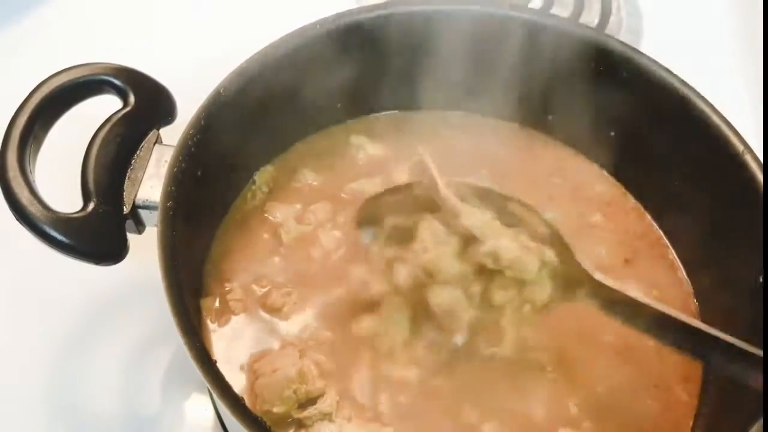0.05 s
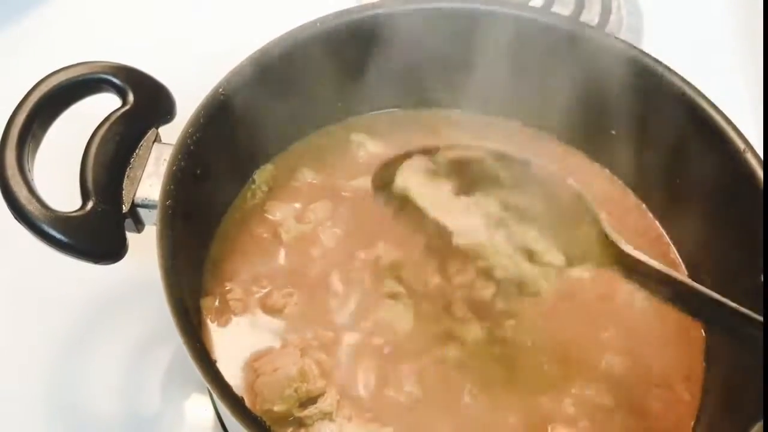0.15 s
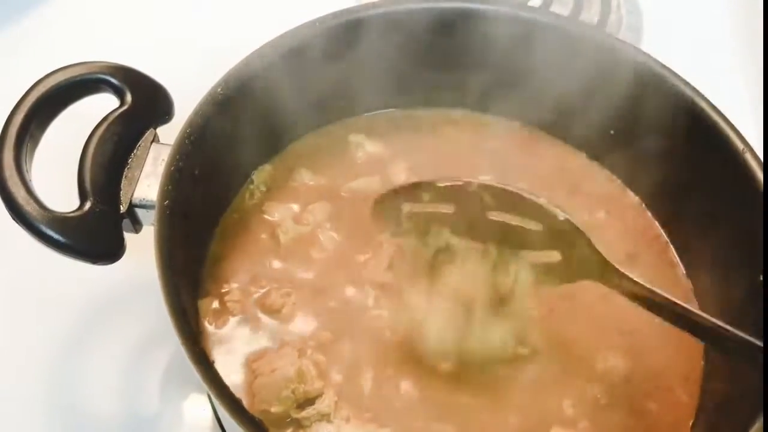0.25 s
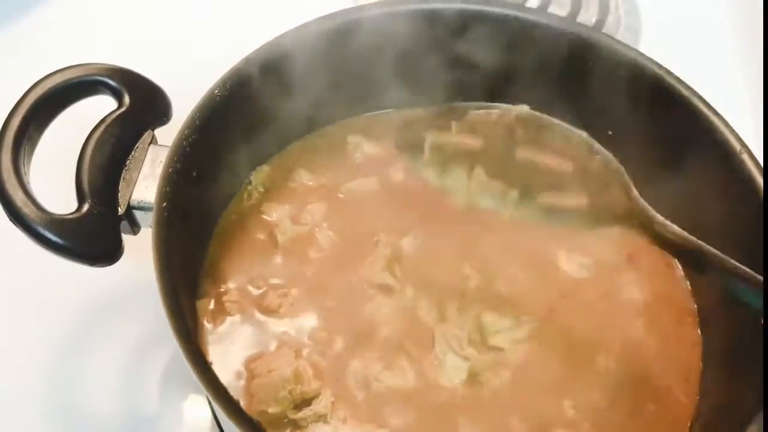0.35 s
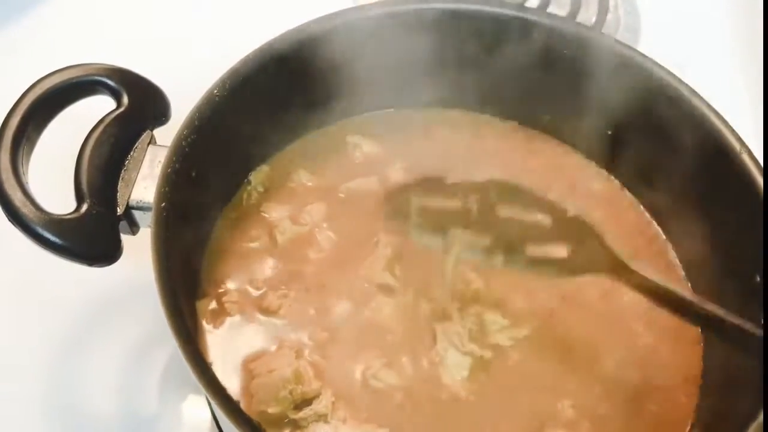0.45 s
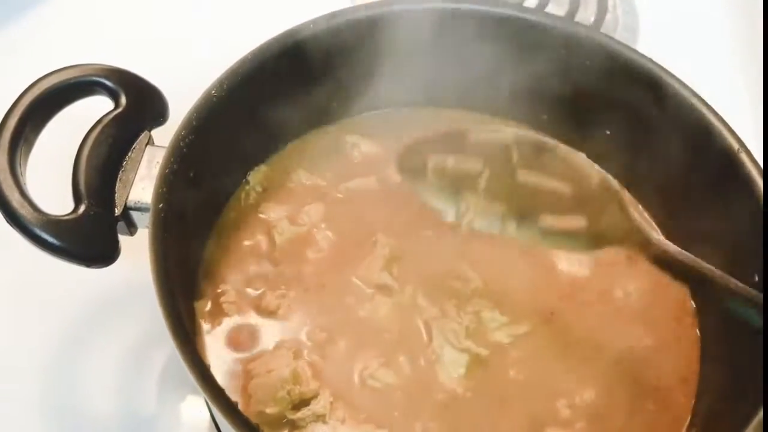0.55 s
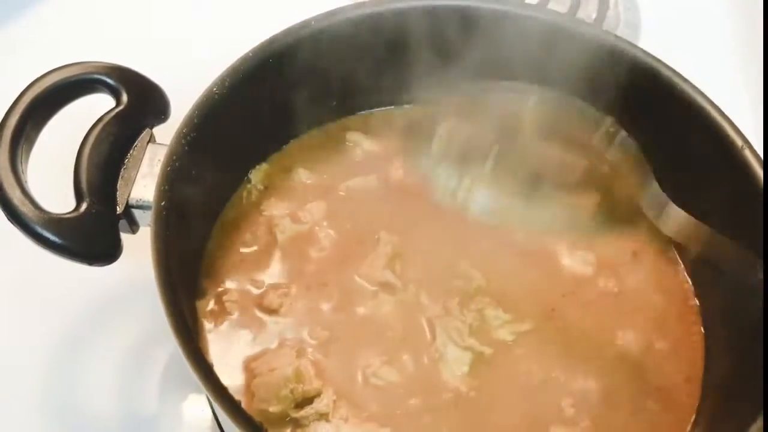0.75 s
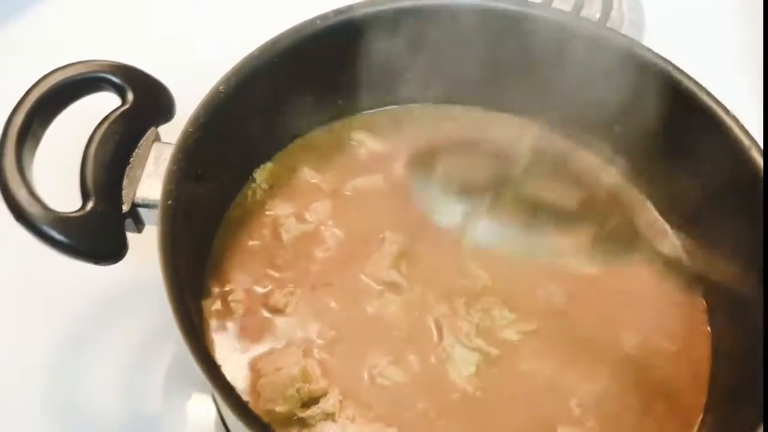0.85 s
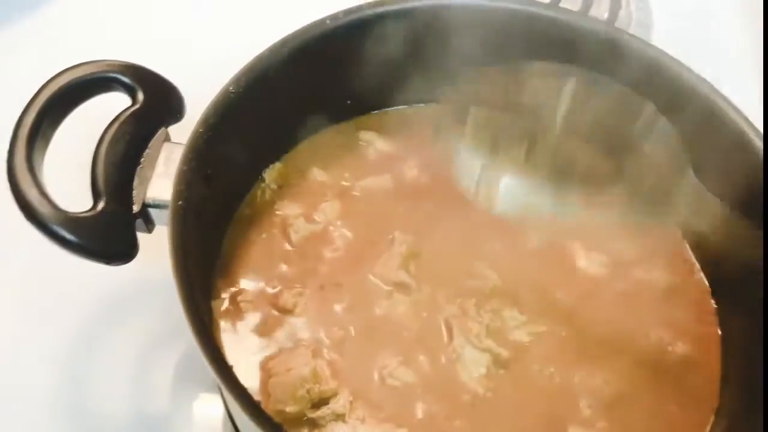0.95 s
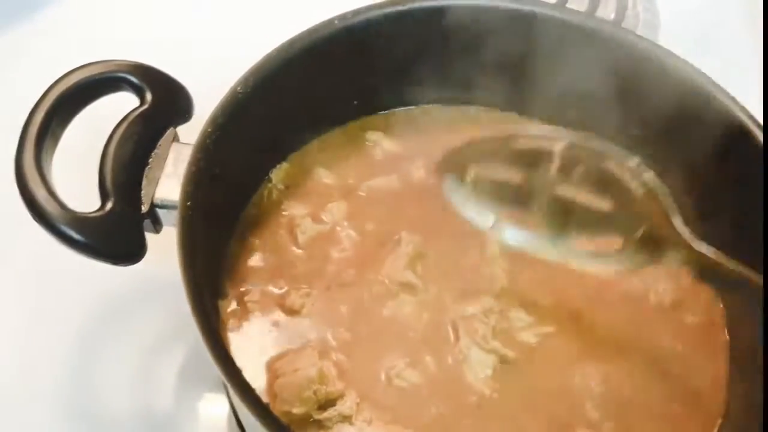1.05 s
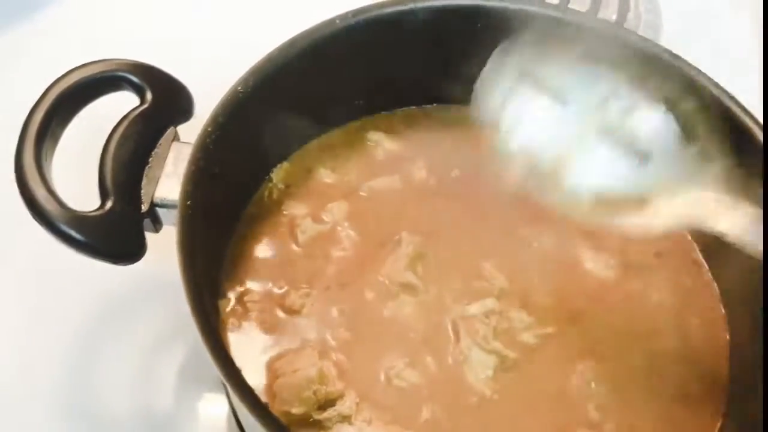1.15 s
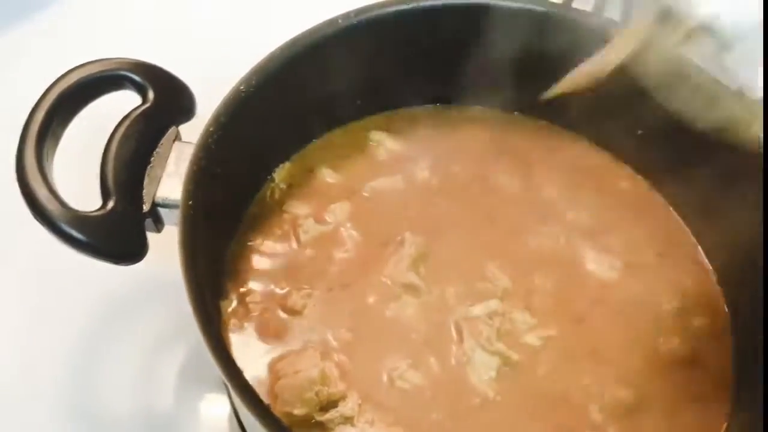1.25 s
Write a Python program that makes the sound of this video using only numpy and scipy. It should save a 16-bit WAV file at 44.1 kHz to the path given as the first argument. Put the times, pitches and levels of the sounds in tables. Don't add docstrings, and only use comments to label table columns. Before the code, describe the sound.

Metal spoon knocks sharply five times on a cooking pot's rim over faintly simmering sauce.

```python
import sys
import numpy as np
from scipy import signal
from scipy.fft import rfft, irfft
from scipy.io import wavfile
from scipy.ndimage import uniform_filter1d

SR = 44100
rng = np.random.default_rng(int(sys.argv[2]) if len(sys.argv) > 2 else 0)


def log_audio(samples):
    frames = np.atleast_2d(samples).T
    limited = np.clip(frames, -1, 1)
    pcm = np.round(limited * 32767).astype(np.int16)
    wavfile.write(sys.argv[1], SR, pcm)


def gain_from_db(level_db):
    decades = np.asarray(level_db, float) / 20
    return 10 ** decades


N = 57330

# (frequency [Hz], level [dB])
HISS_COLOUR = [(30, -19), (60, 11), (130, -16.5), (330, -10), (780, -8.5), (2000, -15.5), (5000, -20.5),
               (16500, -24)]
# (frequency [Hz], decay to -60 dB [s])
KITCHEN_T60 = [(100, 0.93), (500, 0.36), (1500, 0.35), (5000, 0.43), (14000, 0.19)]
# (time [s], level [dB])
SPITS = [
    (0.1336, -20),
    (.28, -33),
    (.317, -29),
    (0.3198, -29),
    (.352, -39),
    (0.972, -48),
]
# (time [s], level [dB], pitch [Hz])
BUBBLES = [(.071, -41.5, 750), (0.084, -48, 620), (.15, -43, 704), (.93, -37.5, 1340), (.385, -41.5, 4100),
           (0.923, -38, 860), (.928, -36, 715), (.97, -40, 1210), (.971, -46, 1500), (1.19, -42.5, 750),
           (1.205, -40, 633), (1.285, -36, 760), (1.285, -43, 1000)]
# (frequency [Hz], level [dB])
SPIT_COLOUR = [(1500, -29), (3000, 3), (5000, -9), (8000, -9), (13500, -0.5), (16500, -3)]
# (time [s], pot ring [dB], thud [dB], crack [dB],
# thud pitch [Hz])
BLOWS = [
    (.2257, -9.5, -1, -7.5, 1737),
    (0.4325, -7.5, -6.5, -6, 1293),
    (0.6032, -10.5, -11, -13, 1297),
    (0.8065, -8.5, -4, -7.5, 1253),
    (1.0014, -8, -12.5, -6, 1290),
         (1.0068, -18.5, -25, -7.5, 1580),
    (.4324, -53, 1, -43, 2120),
]
# (time [s], level [dB])
BOWL_SINGS = [
    (.4324, -34),
    (.6035, -28),
    (.8064, -21),
    (1.0016, -29),
    (1.0068, -27),
]
# (frequency [Hz], level [dB], decay to -60 dB [s])
SUPPORT_MODES = [(109.7, -40, 1), (147.9, -26, 0.4), (194, -36.5, 0.4), (265.2, -19, 0.18),
                 (345.3, -24.5, 0.14)]
# (frequency [Hz], level [dB], decay to -60 dB [s])
WALL_MODES = [(555, -13.5, 0.066), (576.8, -13.5, 0.065), (620, -16, 0.083), (750, -21.5, 0.11),
              (836, -28.5, 0.32), (1089, -21.5, 0.18), (1170, -20, 0.19), (1202, -26, 0.23),
              (1264, -3, 0.04), (1447, -19, 0.13), (1354, -20, 0.15), (1617, -24, 0.13),
              (1844, -14.5, 0.072), (2319, -8.5, 0.027)]
# (frequency [Hz], level [dB], decay to -60 dB [s])
SPOON_MODES = [(2890, -19, 0.022), (3380, 0, 0.033), (3935, -2, 0.036), (5960, -31, 0.07),
               (6088, -4, 0.032), (8400, -19, 0.02)]
# (frequency [Hz], level [dB], decay to -60 dB [s])
EDGE_MODES = [(3690, -16.5, 0.0042), (6300, 0, 0.0032), (9870, 3.5, 0.0035), (12700, -12, 0.0041),
              (13820, -0.5, .006)]
# (frequency [Hz], level [dB])
CRACK_COLOUR = [(1000, -55), (3500, 7.5), (5000, -5.5), (6500, 2.5), (8500, 4), (10000, -1), (14000, 4.5),
                (16500, -20)]
# (frequency [Hz], level [dB])
RATTLE_COLOUR = [(150, -2.5), (430, -8), (570, 1.5), (920, -6), (1250, 1.5), (4800, -13.5), (7000, -8),
                 (16500, -15)]
# (frequency [Hz], decay to -60 dB [s])
RATTLE_T60 = [(100, 0.19), (1200, 0.077), (4000, 0.073), (14000, 0.049)]
# (frequency [Hz], width [Hz], share left [0-1])
HOLLOW_DIPS = [(430, 90, 0.083), (895, 87, 0.28)]
# (time [s], fully empty [s], lowest lost frequency [Hz], share of bands kept [0-1])
DROPOUTS = [
    (.544, .001, 1900, .2),
    (.907, .001, 2200, .22),
    (1.099, .001, 1800, .25),
    (1.195, .022, 1300, .16),
]


def unit(x):
    return x / np.sqrt(np.mean(x ** 2) + 1e-20)


def along(points, hz):
    f, value = np.transpose(points)
    return np.interp(np.log(hz + 1), np.log(f + 1), value)


def coloured(x, spectrum):
    gain = gain_from_db(along(spectrum, np.fft.rfftfreq(len(x), 1 / SR)))
    return irfft(rfft(x) * gain, len(x))


def add(out, s, sound):
    part = out[int(round(s * SR)):][:len(sound)]
    part += sound[:len(part)]


def dying(t60s):
    length = SR // 2
    hz, t, z = signal.stft(rng.standard_normal(length), SR, nperseg=256)
    t60 = np.abs(along(t60s, hz))[:, None]
    return signal.istft(z * gain_from_db(-60 * t / t60), SR, nperseg=256)[1][:length]


def room(x):
    tail = dying(KITCHEN_T60)
    wet = signal.fftconvolve(x, tail / np.linalg.norm(tail))
    return gain_from_db(-15) * np.pad(wet, (150, 0))[:len(x)]


def burner():
    z = signal.stft(rng.standard_normal(N + 600), nperseg=512)[2]
    field = uniform_filter1d(rng.standard_normal(z.shape), 6, 0)
    field = uniform_filter1d(field, 8, 1)
    patchy = z * gain_from_db(1.2 * unit(field))
    hiss = unit(coloured(signal.istft(patchy, nperseg=512)[1][:N], HISS_COLOUR))
    hiss = irfft(rfft(hiss) * (np.fft.rfftfreq(N, 1 / SR) < 15850), N)
    hum = np.sin(2 * np.pi * 58 * np.arange(N) / SR)
    return gain_from_db(-49.5) * hiss + gain_from_db(-62) * hum


def crack(t, colour):
    hold_s, t60_s = 0.0009, 0.002
    level_db = -7.5 - 60 * np.maximum(t - hold_s, 0) / t60_s
    return unit(coloured(rng.standard_normal(len(t)), colour)) * gain_from_db(level_db)


def bubble(t, hz):
    cycles, rise = 3, 0.081
    u = t * hz / cycles
    swell = 6 * u * np.exp(-3 * u)
    return swell * np.sin(2 * np.pi * cycles * (u + rise * u * u / 2))


def sauce():
    out, t = np.zeros(N), np.arange(SR // 4) / SR
    for s, db in SPITS:
        spit = gain_from_db(db - 60 * t / 0.022) * crack(t, SPIT_COLOUR)
        add(out, s, spit + 1.5 * room(spit))
    simmer_db, simmer_hz, spread = -70, 800, 0.4
    small = []
    for when, loud, pitch in rng.random((70, 3)):
        hz = simmer_hz * np.exp(spread * (2 * pitch - 1))
        small.append((when * N / SR, simmer_db + 8 * loud, hz))
    for s, db, hz in BUBBLES + small:
        add(out, s, gain_from_db(db) * bubble(t[:SR // 16], hz))
    return out


def ring(modes, t, attack_s):
    scatter_db, rough, rough_per_s, rough_grows_s = 1.2, 1.3, 90, 0.03
    hz, db, t60 = np.transpose(modes)[:, :, None]
    chance = rng.standard_normal((len(modes), 1))
    knots = rng.standard_normal((2, len(modes), rough_per_s + 2))
    drift = np.array([[np.interp(t * rough_per_s, np.arange(len(k)), k) for k in side] for side in knots])
    size, phase = rough * drift * (1 - np.exp(-t / rough_grows_s))
    waver = (1 + size / 2) * np.sin(2 * np.pi * hz * t + phase)
    partials = gain_from_db(db + scatter_db * chance - 60 * t / t60) * waver
    return partials.sum(0) * (1 - np.exp(-t / attack_s))


def spoon(t):
    edge = gain_from_db(-5.5) * ring(EDGE_MODES, t, 0.0001)
    return crack(t, CRACK_COLOUR) + edge + gain_from_db(-17.5) * ring(SPOON_MODES, t, 0.0001)


def wall_thud(t, db, hz):
    t60 = 0.013 * (1270 / hz) ** 3.37
    return np.sin(2 * np.pi * hz * t) * gain_from_db(db - 60 * t / t60) * (1 - np.exp(-t / 0.00038))


def pot_ring(t):
    rattle = gain_from_db(-15.5) * coloured(dying(RATTLE_T60), RATTLE_COLOUR) * 6 * (1 - np.exp(-t / 0.00098))
    gate = np.arange(len(t)) / SR < 0.4
    return ring(WALL_MODES, t, 0.001) + ring(SUPPORT_MODES, t, 0.00067) + rattle * gate


def hollow(x):
    f, gain = np.fft.rfftfreq(len(x), 1 / SR), 1
    for hz, width, left in HOLLOW_DIPS:
        detune = hz * hz - f * f
        gain = gain * (detune + 1j * f * width * left) / (detune + 1j * f * width)
    return irfft(rfft(x) * gain, len(x))


def knocks():
    out, t = np.zeros(N), np.arange(SR // 2) / SR
    ending = np.clip(10 * (t[-1] - t), 0, 1)
    late = np.maximum(t - 0.0007, 0)
    for s, pot_db, thud_db, crack_db, thud_hz in BLOWS:
        pot = wall_thud(late, thud_db, thud_hz) + gain_from_db(pot_db) * pot_ring(late)
        hit = pot + gain_from_db(crack_db) * spoon(t)
        add(out, s, ending * (hit + room(hit)))
    for s, db in BOWL_SINGS:
        bowl = gain_from_db(db) * ring([(7015, 0, 0.075)], t, 0.00035)
        add(out, s, ending * (bowl + room(bowl)))
    return hollow(out)


def scene():
    return (knocks() + sauce() + burner())[None]


def treble_dropouts(x):
    fade_s, band_hz = 0.013, 170
    hz, t = np.fft.rfftfreq(N, 1 / SR), np.arange(N) / SR
    for s, empty_s, low_hz, kept in DROPOUTS:
        tally = np.floor(np.cumsum(2 * kept * rng.random(SR // band_hz)))
        survives = np.diff(tally, prepend=0)[(hz // band_hz).astype(int)] * (hz < 12500)
        depth = np.sin(np.pi / 2 * np.clip(1 - (abs(t - s) - empty_s / 2) / fade_s, 0, 1))
        lost = irfft(rfft(x) * (1 - survives) * (hz > low_hz), N)
        x = x - depth * lost
    return x


def band_limit(x):
    return signal.sosfilt(signal.butter(12, 17040, fs=SR, output="sos"), x)


def record(dry):
    hz = np.fft.rfftfreq(N, 1 / SR)
    low = 1j * hz / 51
    bass = (low / (1 + low)) ** 2
    top = (gain_from_db(-27) + 1 / (1 + (hz / 15900) ** 90)) * (hz < 17000)
    mix = treble_dropouts(irfft(rfft(dry) * bass * top, N))
    return band_limit(mix)


dry = scene()
out = record(dry)
log_audio(out)
```